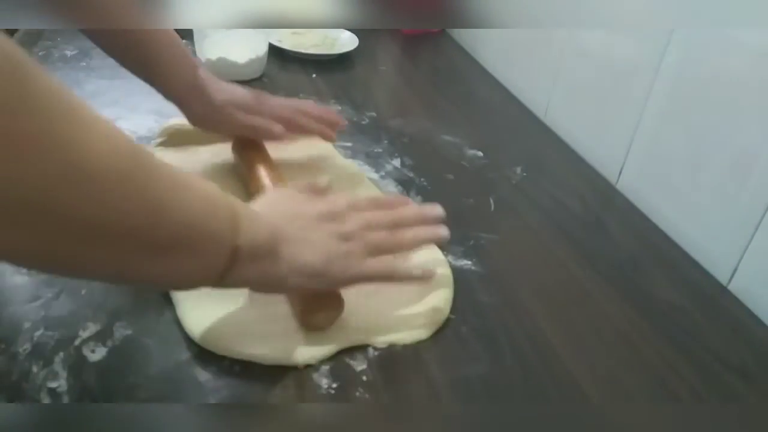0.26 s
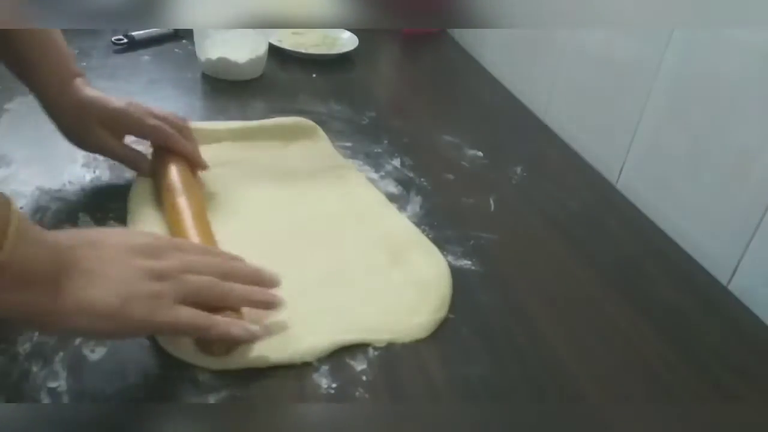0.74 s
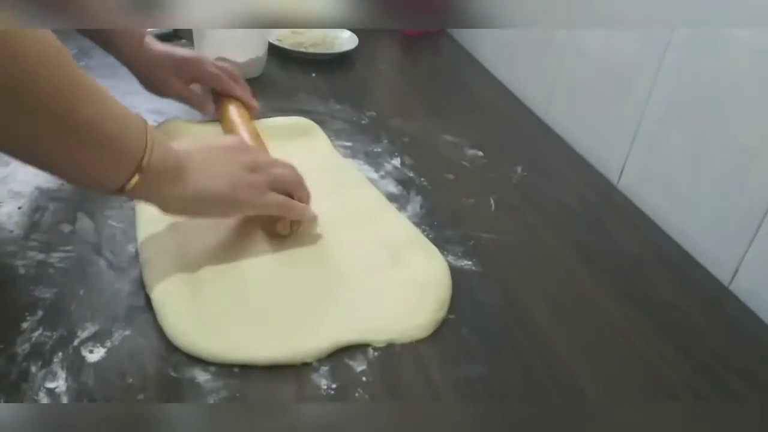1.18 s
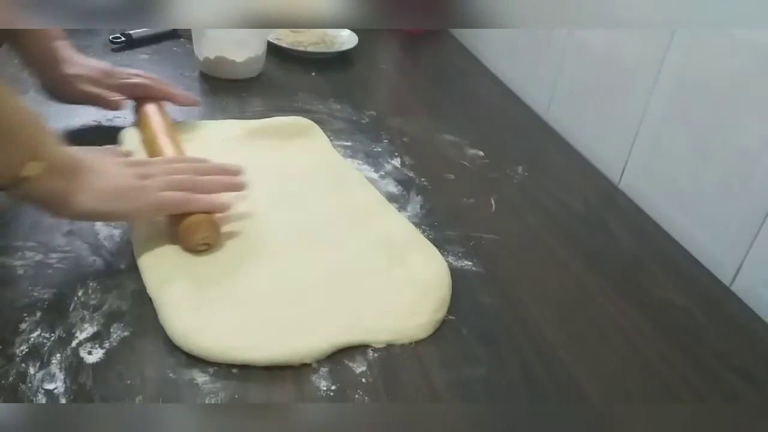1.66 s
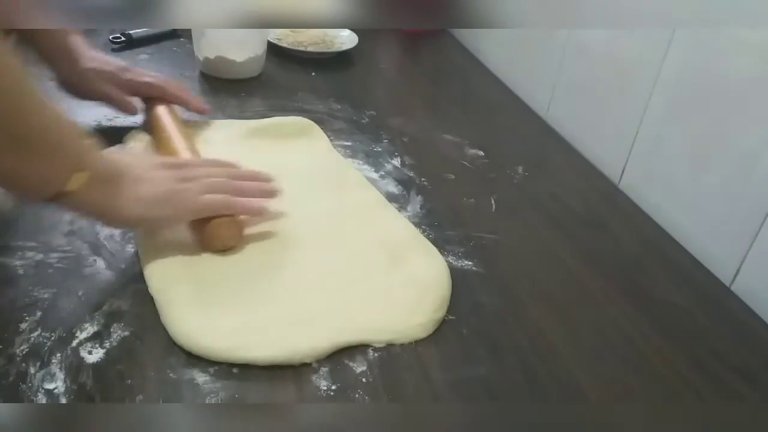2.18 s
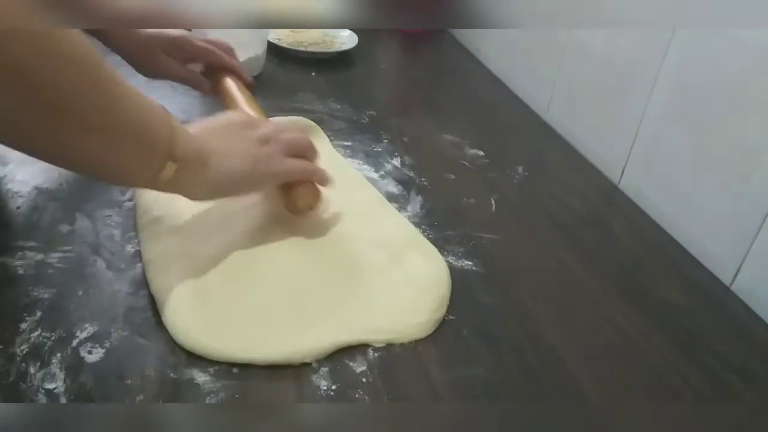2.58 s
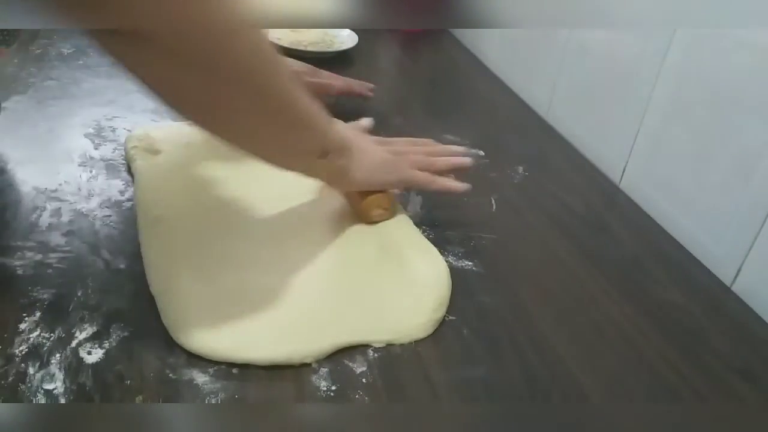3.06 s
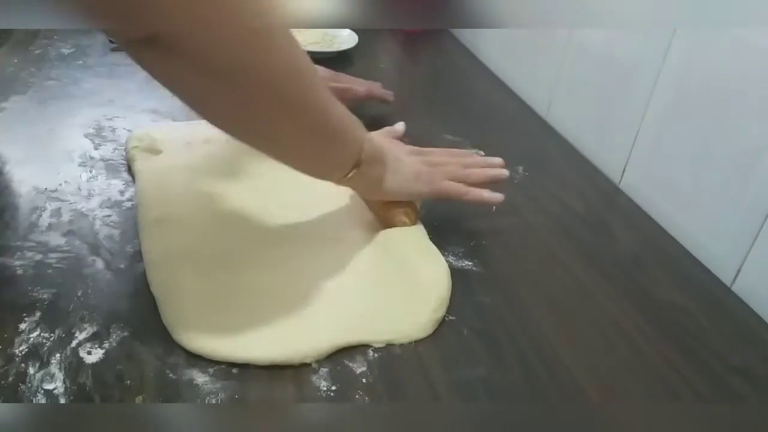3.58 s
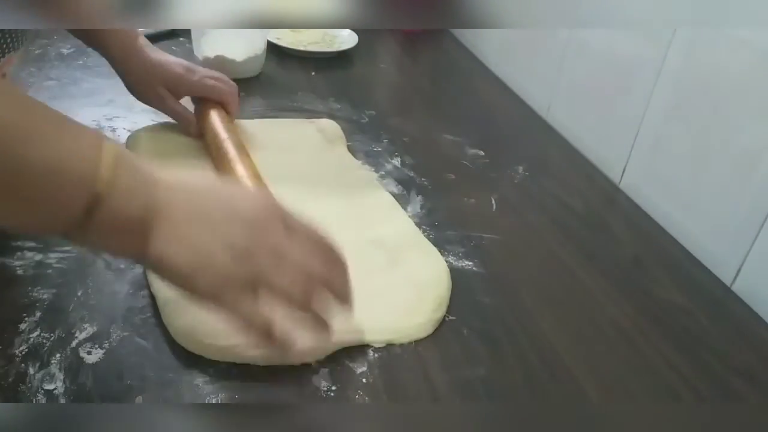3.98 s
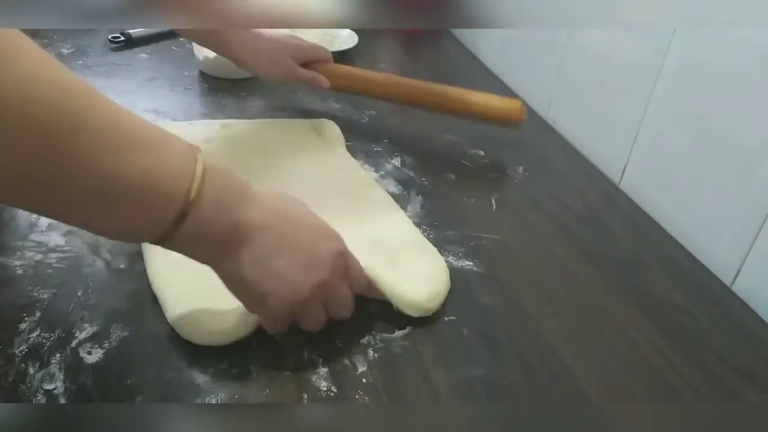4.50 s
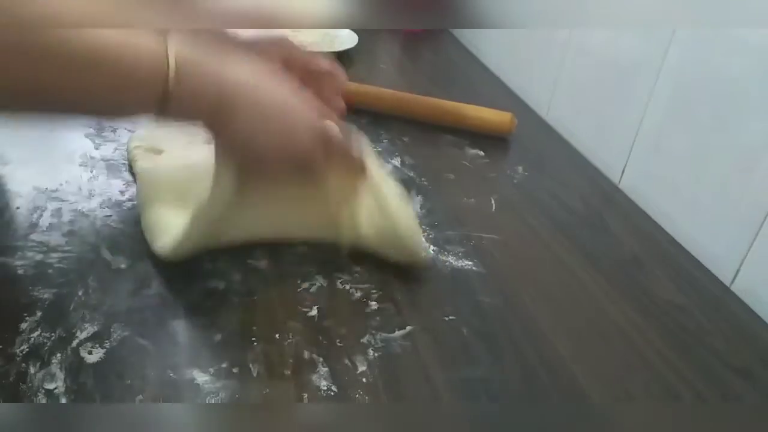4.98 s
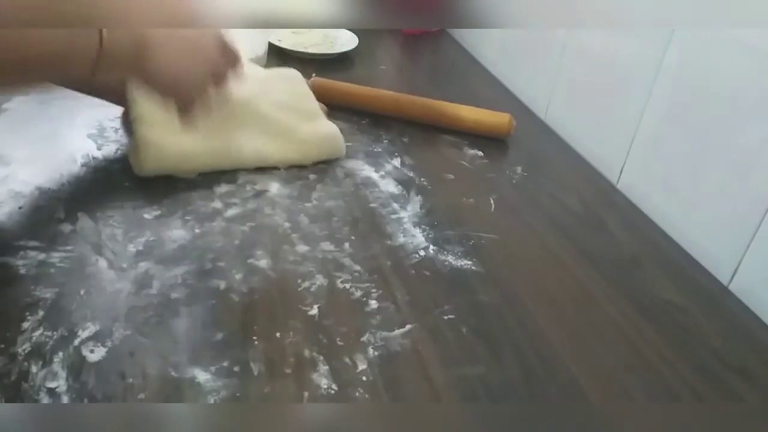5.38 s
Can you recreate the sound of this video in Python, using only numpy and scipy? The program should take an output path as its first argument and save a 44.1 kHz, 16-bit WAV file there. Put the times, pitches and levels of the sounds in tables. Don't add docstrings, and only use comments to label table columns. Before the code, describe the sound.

A wooden rolling pin thuds and knocks on a hollow counter while palms rub floured dough, ending with a dough slap and loud wooden clatter.

```python
import sys
import numpy as np
from scipy import signal
from scipy.fft import rfft, irfft
from scipy.io import wavfile
from scipy.ndimage import uniform_filter1d

SR = 44100
rng = np.random.default_rng(int(sys.argv[2]) if len(sys.argv) > 2 else 0)


def transcribe(signal):
    frames = np.atleast_2d(signal).T
    limited = np.clip(frames, -1, 1)
    pcm = np.round(limited * 32767).astype(np.int16)
    wavfile.write(sys.argv[1], SR, pcm)


def rack_gain(trim_db):
    fader = np.asarray(trim_db, float)
    return 10 ** (fader / 20)


N = 248591
RING = 2 ** 14

# (frequency [Hz], level [dB per Hz])
HISS = [(1760, -32), (3000, -8.5), (4930, -5.5), (6670, -2), (9020, 2.5), (10400, -7.5), (12500, -3.5),
        (13200, -9), (13500, -8.5)]


def blows():
    # (frequency [Hz], t60 [s])
    room_t60 = [(60, 0.89), (150, 0.53), (400, 0.45), (1000, 0.35), (2100, 0.49), (2900, 0.4), (6000, 0.32),
                (12000, 0.26)]
    # (frequency [Hz], level [dB], t60 [s])
    mode_rows = [(99, -6, .5), (127, -4, .55), (146, 1, .65), (183, -5, .4), (250, -8, .4), (273, 0, .45),
                 (300, -4, .45), (328, -4, .45), (345, -5, .4), (400, -6, .4), (423, -5, .4), (460, -6, .4),
                 (547, -1, .45), (574, -6, .4),
                 (650, -7, .35), (735, -8, .35), (847, -5, .35), (975, -9, .3), (1072, -3, .3), (1176, -5, .33),
           (1325, -2, .28), (1523, -7, .27), (1700, -9, .27), (1850, -9, .3), (1972, -6, .27),
           (2096, -8, .27), (2323, -6, .24)]
    share_hz = [130, 380, 1600, 6000]
    # (frequency [Hz], level [dB])
    slope = [(55, -5.5), (90, -0.6), (700, -1.5), (2250, -1.0), (2600, 0), (3400, -1), (5000, -5.5),
             (13000, -11.0)]
    direct_db, direct_t60_s = -5, 0.065
    rise_s = 0.0015

    out, t = np.zeros(N), np.arange(RING) / SR
    centres_hz = 55 * 2 ** np.arange(0, 8.1, 1 / 3)
    octaves = np.log2(np.fft.rfftfreq(RING, 1 / SR) + 1)
    offset = octaves - np.log2(centres_hz)[:, None]
    bands = np.cos(np.pi / 2 * np.clip(3 * offset, -1, 1))
    shape = np.array([fade(along(room_t60, f)) * (1 - np.exp(-t * f / 1.55)) for f in centres_hz])
    shape *= 1 + rack_gain(direct_db) * fade(direct_t60_s)
    push = 2.2 * np.array([np.sin(2 * np.pi * f * t) * np.exp(-t * f / 3.0) for f in centres_hz])

    modes = mode_rows
    mode_hz, mode_db, _ = np.transpose(modes)
    rings = np.array([np.sin(2 * np.pi * f * t) * fade(t60) for f, _, t60 in modes])
    slope_db = along(slope, centres_hz)
    gate = rack_gain(-6.0 / (1 + np.exp((0.095 - t) / 0.013)))

    for s, db, *share_db in contacts():
        colour = list(zip(share_hz, share_db))
        tail = irfft(rfft(rng.standard_normal(RING)) * bands, RING)
        tail /= tail.std(axis=1, keepdims=True)
        tail = tail * shape * rack_gain(2.16 * flutter(215.5, size=RING))
        room = rack_gain(along(colour, centres_hz) + slope_db - 17.5) @ (tail + push)

        sign, spread = rng.standard_normal((2, len(modes)))
        drive_db = along(colour, mode_hz) + mode_db + 3.03 * spread - 12.0
        ringing = (np.sign(sign) * rack_gain(drive_db)) @ rings

        thump_db, board_db = share_db[:2]
        bass_hz = np.clip(88 + 4.6 * (board_db - thump_db), 62, 135)
        highpass = signal.butter(4, bass_hz, "high", fs=SR, output="sos")
        add(out, s + rise_s, rack_gain(db) * signal.sosfilt(highpass, (room + ringing) * gate))
    return out


def contacts():
    # (thump [dB], board [dB], wood [dB], crack [dB])
    soft = (2.5, -36, -23, -8.5)
    flat = (-3, -5, -12, -4.5)
    edge = (2, 0.5, -6, -38)
    wet = (-45, -25, -0.5, -12.5)
    loose = (-1, 0.5, -6.5, -25)
    # (time [s], blow [dB], extra thump [dB], extra hardness [dB])
    presses = [
        (0.348, -57, 2, 3),
        (0.429, -59, -5, -1),
        (1.287, -51.5, 1, 11.5),
        (2.748, -58, 6, -8),
        (3.224, -40, 5.5, 0.5),
        (4.844, -54, 0, -14),
    ]
    drops = [
        (0.667, -32.5, 7.5, 7),
        (0.678, -29, 0.5, -5),
        (0.711, -32, -2, -8.5),
        (0.884, -54, -4, -9),
    ]
    knocks = [
        (1.746, -47.5, 2, -2),
        (1.789, -37.5, -7.5, -4.5),
        (1.824, -49.5, 0, 3),
        (2.033, -45, -11.5, -16),
        (2.076, -59, -10, 2),
        (3.24, -40.5, 1, 1.5),
        (3.267, -34.5, -3, 1.5),
        (3.302, -53, -3, 3),
        (4.671, -53, -2.5, -9),
        (4.694, -50.5, -22, -8.5),
    ]
    slaps = [
        (5.06, -30, -5, 0),
        (5.083, -35.5, 8, 0),
    ]
    clatter = [
        (5.232, -20.5, -7.5, 6.5),
        (5.242, -33, -20, 13),
        (5.272, -25.5, -8, 5),
        (5.282, -30, -1, -4),
        (5.35, -27, -5.5, -10),
        (5.396, -39, -5, -7),
    ]
    crack_per_hard = 0.63

    kinds = (soft, presses), (flat, drops), (edge, knocks), (wet, slaps), (loose, clatter)
    events = []
    for (thump, board, wood, crack), rows in kinds:
        for s, db, weight, hard in rows:
            events.append((s, db, thump + weight, board, wood + hard, crack + crack_per_hard * hard))
    return sorted(events)


def rubbing():
    # (time of fastest slide [s], hiss [dB], swell [s], dying [s], scuff above hiss [dB])
    rolls = [(0.0, -68, .1, 0.27, -9), (0.2, -67, 0.35, 0.089, -3.5), (0.47, -60, 0.11, .065, -9),
             (0.67, -66, 0.07, 0.2, -1.5), (1.05, -63, 0.19, 0.79, -2.5), (1.29, -63, 0.37, 0.22, -5),
             (1.43, -72.5, 0.16, 0.13, -0.5), (1.56, -72.5, .06, 0.16, 0.5), (1.76, -64.5, 0.04, 0.22, -1),
             (2.09, -68.5, .12, 0.39, 5.5), (2.2, -57, 0.21, 0.2, -9.5), (2.47, -64.5, 0.29, 0.26, -6.5),
             (2.75, -66, 0.17, 0.26, -11.5), (2.95, -61.5, 0.11, 0.092, -7),
             (3.23, -63.5, 0.019, 0.17, 1.5), (3.48, -67.5, 0.55, 0.2, -1.5),
             (3.66, -64.5, 0.068, 0.24, -7.5), (3.88, -74, 0.35, 0.14, 1), (4.1, -66.5, 0.24, 0.13, -6.5)]
    # (time [s], hiss [dB], swell [s], dying [s], scuff above hiss [dB])
    lifts = [
        (4.26, -69, 0.1, 0.57, -10),
        (4.33, -68, 0.2, 0.33, -3),
        (4.57, -69, 0.053, 0.08, -2),
        (4.68, -65, 0.057, 0.074, -6),
        (4.9, -63, 0.3, 0.34, -2),
        (5.24, -61, 0.13, 0.18, -5.5),
        (5.54, -53, 0.073, 0.19, -9.5),
        (5.59, -56, 0.11, .9, -9),
        (5.64, -56, 0.14, 0.12, -8.5),
    ]
    # (frequency [Hz], level [dB per Hz])
    scuff_colour = [(290, -8), (500, -1.5), (1200, -2.5), (1920, 0.5), (2300, -4), (2540, -2), (3230, -2),
                    (5500, -3), (7150, -28), (12100, -120)]
    # (frequency [Hz], level [dB per Hz])
    wide_colour = [(300, -47), (3900, -53), (4500, -1), (9000, 7.5), (10500, 3), (13000, -2.5)]

    hiss_rows, scuff_rows = [], []
    for s, db, rise, fall, above in rolls + lifts:
        hiss_rows.append((s, db, rise, fall))
        scuff_rows.append((s, db + above, rise, fall))
    hiss_db = swells(hiss_rows, -82.5)
    scuff_db = swells(scuff_rows, -84, linger=1.1)

    grain = rack_gain(hiss_db + 1.33 * flutter(90) + 1.26 * flutter(700))
    hiss = grain * mottled(HISS, [4150, 5060, 7480, 9700], 22.25, 1.07)
    scuff = rack_gain(scuff_db + 1.4 * flutter(40)) * mottled(scuff_colour, [1050, 1560, 2120, 2880], 14, 2.7)
    side = rack_gain(-6.0) * grain * mottled(wide_colour, [6500, 9000], 16, 2.4)
    return hiss + scuff, side


def drumming():
    # (time [s], level [dB], swell [s], dying [s])
    loads = [(0.05, -74, .9, 0.82), (0.41, -59.5, 0.11, 0.16), (0.56, -66.5, 0.48, .15),
             (0.8, -65, .9, 0.8), (1.36, -63.5, 0.24, 0.43), (1.55, -76, 0.49, 0.13),
             (1.76, -46.5, 0.027, 0.047), (2.09, -64, 0.35, 0.11), (2.4, -46, 0.074, 0.07),
             (2.9, -70.5, 3.0, 0.28), (3.5, -65, 0.12, 0.2), (3.66, -74.5, .6, .9), (3.94, -74, .09, 1),
             (4.33, -69, 0.21, 0.44), (4.57, -69, 0.044, 0.26), (4.9, -63, 0.52, 0.27),
             (5.07, -63.5, 0.061, 0.23), (5.24, -63, 0.037, 0.4), (5.58, -70, .14, 3.0)]
    # (frequency [Hz], level [dB per Hz])
    drum_colour = [(12, -51), (20, -50), (38, -4), (92, 0), (141, 4), (163, -10), (217, -30), (308, -8.5),
                   (338, -13.5), (500, -68.5), (650, -81), (1100, -120)]
    drum_db = swells(loads, -78)
    return rack_gain(drum_db + 3.2 * flutter(11)) * noise(drum_colour)


def shudder():
    # (time [s], level [dB])
    level = [
        (2.28, -80),
        (2.3, -59.5),
        (2.356, -61),
        (2.374, -45.5),
        (2.414, -39),
        (2.446, -37),
        (2.574, -53.5),
        (2.604, -72),
        (2.66, -65.5),
    ]
    # (frequency [Hz], width [Hz], level [dB])
    modes = [(101.3, 30, -7), (149.2, 17, 2), (222, 46, -19), (287, 24, -27), (369.4, 23, -26.5),
             (464, 26, -31.5)]
    push = rng.standard_normal(N)
    board = np.zeros(N)
    for hz, width_hz, db in modes:
        board += rack_gain(db) * resonance_twice(push, hz, width_hz) / np.sqrt(width_hz)
    s, db = np.transpose(level)
    level_db = np.interp(np.arange(N) / SR, s, db, -150, -150)
    return rack_gain(level_db) * board / board.std()


def wrist_ticks():
    # (time [s], level [dB], pitch [Hz], t60 [s])
    ticks = [(0.125, -67, 4620, 0.18), (0.17, -52, 4720, 0.21), (0.9383, -77, 2280, 0.25),
             (0.9697, -59, 2260, 0.32), (1.0494, -57, 5320, 0.29), (1.1504, -57, 1740, 0.27),
             (1.2684, -51, 1860, 0.33), (1.4302, -43, 3060, 0.042), (1.5544, -59, 3630, 0.28),
             (2.0835, -54, 2460, 0.68), (2.1944, -53.5, 4660, 0.21), (2.2403, -48.5, 4970, 0.16),
             (3.1602, -61.5, 3900, 0.63), (3.39, -60, 1620, 0.68), (3.478, -59, 2440, 0.41),
             (3.621, -66, 1570, 0.98), (3.8163, -65, 2280, 0.3), (3.853, -54.5, 3820, 0.32),
             (4.09, -66, 4560, 0.19), (4.28, -62, 1590, 0.53), (4.3166, -56.5, 4000, 0.23),
             (4.5466, -60.5, 1750, 0.47), (4.7794, -61, 1950, 0.24), (4.8843, -51, 5110, 0.18),
             (4.9067, -54, 4330, 0.22)]
    out = np.zeros(N)
    for s, db, hz, t60_s in ticks:
        add(out, s, tick(db, hz, t60_s))
    return out


def bangle():
    # (time [s], level [dB], pitch [Hz])
    touches = [(0.633, -60, 3000), (1.4285, -57, 3040), (2.128, -49, 2660), (2.7198, -61, 2880),
               (2.932, -56.5, 3130), (3.2344, -55, 2950), (3.397, -58, 2830), (3.8531, -59, 2880),
               (4.3181, -58, 2960), (4.5465, -59.5, 3060)]
    out = np.zeros(N)
    for s, db, hz in touches:
        add(out, s, tick(db, hz, t60_s=0.29))
    return out


def flour_snaps():
    # (time [s], level [dB])
    snaps = [(0.4537, -41), (0.9616, -49), (1.4272, -51), (2.0118, -71), (2.198, -44), (2.24, -46),
             (2.3804, -50), (3.654, -44), (4.8844, -35.5), (4.9607, -42), (5.541, -33)]
    out = np.zeros(N)
    for s, db in snaps:
        add(out, s, rack_gain(db - 12.0) * noise(HISS, size=RING) * fade(0.019))
    return out


def room_air():
    # (frequency [Hz], level [dB per Hz])
    air_colour = [(15, -49), (25, -7), (121, 2.5), (228, -7), (429, -11.5), (3090, -19), (6130, -44),
                  (8630, -44), (12500, -34), (13500, -65)]
    air_db = -72.5
    return rack_gain(air_db - 4.0) * noise(air_colour), rack_gain(air_db - 20.0) * noise(air_colour)


def along(table, hz):
    f, db = np.transpose(table)
    return np.interp(np.log(hz + 1), np.log(f), db)


def noise(table, size=N):
    gain = rack_gain(along(table, np.fft.rfftfreq(size, 1 / SR)))
    y = irfft(rfft(rng.standard_normal(size)) * gain, size)
    return y / y.std()


def mottled(table, edges_hz, rate_hz, spread_db):
    spectrum = rfft(noise(table))
    band = np.searchsorted(edges_hz, np.fft.rfftfreq(N, 1 / SR))
    out = np.zeros(N)
    for k in range(len(edges_hz) + 1):
        out += rack_gain(spread_db * flutter(rate_hz)) * irfft(spectrum * (band == k), N)
    return out


def flutter(rate_hz, size=N):
    k = int(SR / rate_hz)
    steps = np.repeat(rng.standard_normal(size // k + 1), k)
    return 1.18 * uniform_filter1d(steps, k)[:size]


def swells(rows, rest_db, linger=1):
    t, out = np.arange(N) / SR, np.full(N, float(rest_db))
    for s, db, rise_s, fall_s in rows:
        distance = np.maximum((s - t) / rise_s, (t - s) / fall_s)
        out = np.maximum(out, db - 20 / linger * distance)
    return out


def tick(db, hz, t60_s):
    ring = resonance_twice(rng.standard_normal(RING), hz, 0.13 * hz)
    attack = 1 - np.exp(-np.arange(RING) / SR / 0.0018)
    return rack_gain(db - 11.0) * ring / ring.std() * fade(t60_s) * attack


def resonance_twice(x, hz, width_hz):
    b, a = signal.iirpeak(hz, hz / width_hz, SR)
    return signal.lfilter(b, a, signal.lfilter(b, a, x))


def fade(t60_s):
    return np.exp(-np.log(1000) * np.arange(RING) / SR / t60_s)


def add(out, s, x):
    i = int(s * SR)
    out[i:i + len(x)] += x[:N - i]


def scene():
    # (frequency [Hz], level [dB])
    ports = [(200, -56), (900, -52), (1400, -36), (1600, -23), (2100, -16), (2400, -36), (4000, -18),
             (4600, -11), (13000, -12)]
    rub, wide = rubbing()
    air, air_side = room_air()
    mid = blows() + rub + drumming() + shudder() + wrist_ticks() + bangle() + flour_snaps() + air

    scatter = rng.standard_normal(RING) * fade(0.17)
    scatter = rfft(scatter / np.sqrt(np.sum(scatter ** 2)), N)
    port_gain = rack_gain(along(ports, np.fft.rfftfreq(N, 1 / SR)))
    side = irfft(rfft(mid) * scatter * port_gain, N)
    side += wide + air_side
    side += rack_gain(-10.5) * resonance_twice(mid, 1900.0, 1000.0)
    return np.array([mid + side, mid - side])


def roll_off(x):
    return signal.sosfilt(signal.butter(12, 13710, fs=SR, output="sos"), x)


def record(dry):
    dry = signal.sosfilt(signal.butter(2, 55, "high", fs=SR, output="sos"), dry)
    dry = signal.sosfilt(signal.ellip(10, 0.3, 60, 13150, fs=SR, output="sos"), dry)
    mid, side = (dry[0] + dry[1]) / 2, (dry[0] - dry[1]) / 2

    narrow_db, threshold_db, window_s = -8, 4.5, 0.041
    k = int(window_s * SR)
    treble = np.diff(mid, 2, prepend=[0, 0])
    treble_db = 10 * np.log10(uniform_filter1d(treble ** 2, k) + 1e-18)
    rise_db = treble_db - np.roll(treble_db, k)
    side = side * rack_gain(narrow_db * np.clip(rise_db - threshold_db, 0, 1))
    return roll_off(np.array([mid + side, mid - side]))


dry = scene()
out = record(dry)
transcribe(out)
```